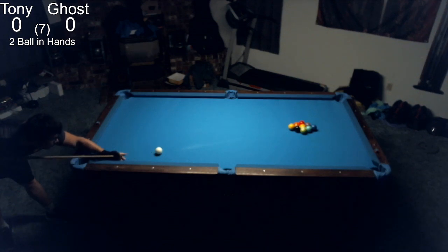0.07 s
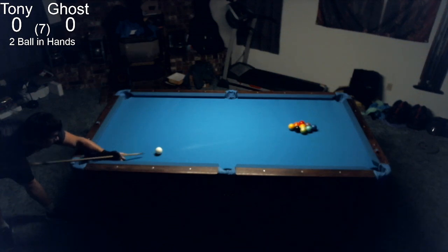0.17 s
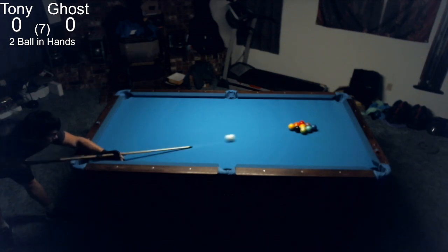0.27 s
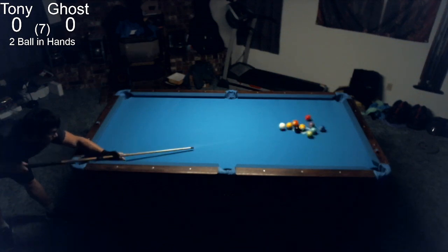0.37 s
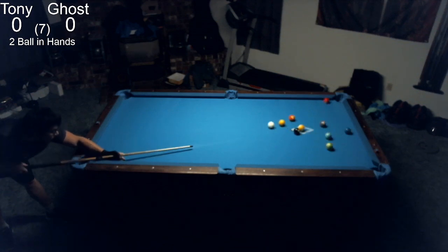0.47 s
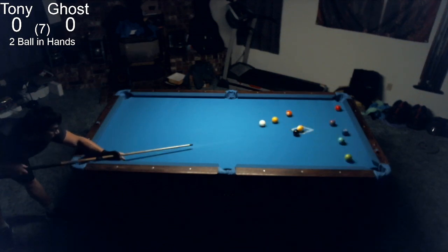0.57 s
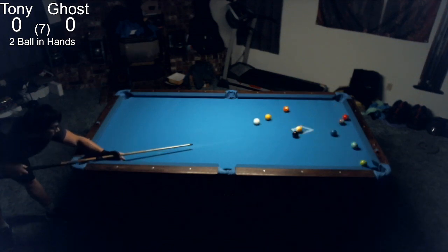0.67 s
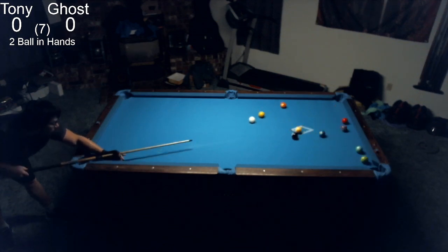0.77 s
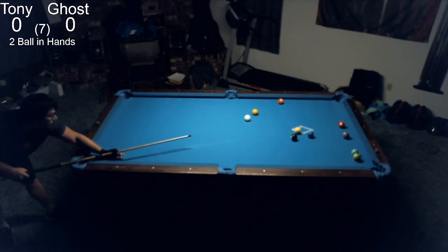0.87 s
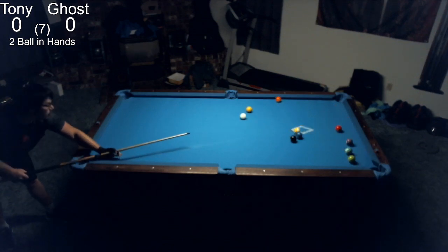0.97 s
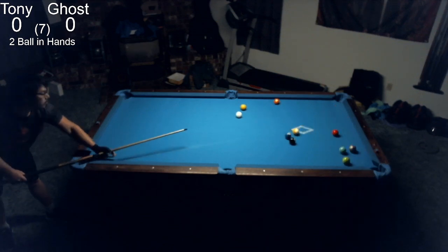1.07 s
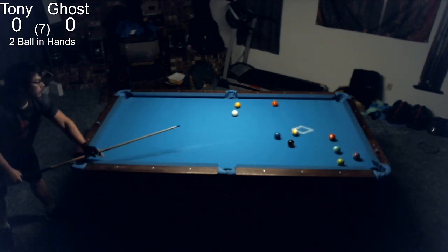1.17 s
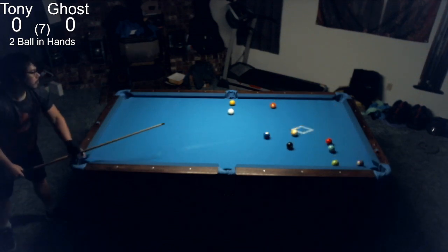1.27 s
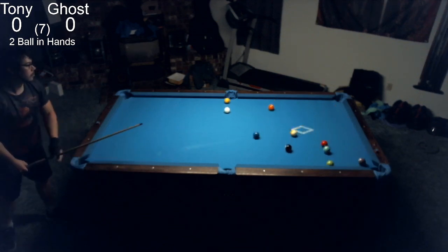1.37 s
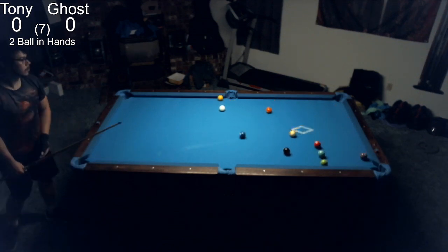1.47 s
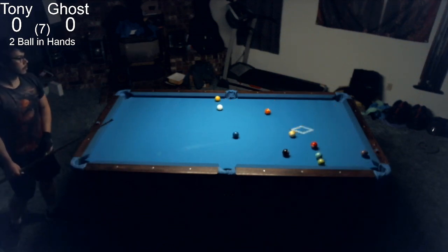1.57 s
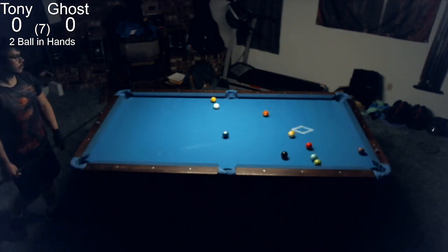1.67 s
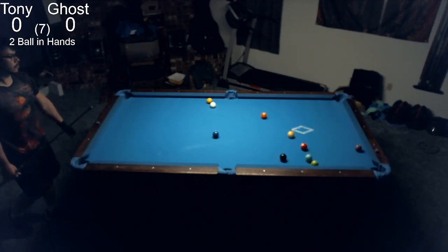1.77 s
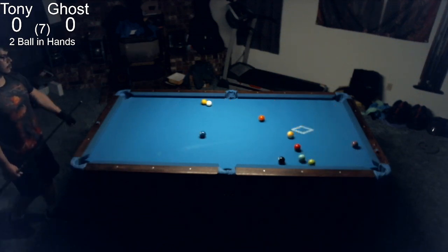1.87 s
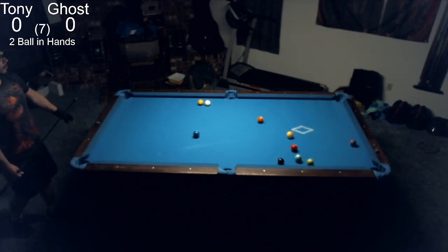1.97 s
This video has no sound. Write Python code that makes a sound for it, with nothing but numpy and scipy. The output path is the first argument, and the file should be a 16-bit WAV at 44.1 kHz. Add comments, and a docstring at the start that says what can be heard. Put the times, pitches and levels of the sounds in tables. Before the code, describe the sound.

A loud double crack of a pool break, cue strike then bursting rack, gives way to soft cushion thuds and scattered ball clicks that thin out. The microphone is high up in a quiet room with faint hum.

```python
"""A quiet carpeted room with a pool table: a nine-ball break, heard from near the ceiling.
The cue tip cracks and the shaft rings, the cue ball bursts the rack and overloads the input.
Balls rumble over the slate and thud into the cushions, and single balls click, loud at first and
softer later, each with its own echoes. A bed of mains hum and hiss lies under it all."""
import sys
import numpy as np
from scipy import signal
from scipy.fft import rfft, irfft
from scipy.io import wavfile

SR = 44100
rng = np.random.default_rng(int(sys.argv[2]) if len(sys.argv) > 2 else 0)


def wav_out(sig):
    """Save sig, one row per channel (or a flat mono array), as 16-bit PCM at SR to the path in sys.argv[1]."""
    wavfile.write(sys.argv[1], SR, np.round(np.clip(np.atleast_2d(sig).T, -1, 1) * 32767).astype(np.int16))


N = 88200

# The room's decay. Each row: frequency in Hz, time to fall 60 dB in seconds.
ROOM_DECAY = [(150, 0.37), (660, 0.43), (1740, 0.32), (4590, .3), (7000, 0.29)]
# Mains hum. Each row: frequency in Hz, rms level in dB.
HUM_PARTIALS = [(60, -69.5), (120, -92.5), (300, -91), (420, -94), (540, -93), (660, -92.5)]
# Tone of the hiss, the tip's crack and the rolling balls. Each row: frequency in Hz, relative level in dB.
HISS_TONE = [(50, -13.5), (130, -1.5), (200, -5), (320, -1.5), (600, -8), (1300, -9), (4600, -14),
             (7400, -21.5)]
TIP_TONE = [(150, -34.5), (250, -19), (450, -8.5), (1000, -7.5), (2100, -0.5), (3000, 1.5), (5000, 0),
            (6300, -9), (7500, -18.5)]
RUMBLE_TONE = [(60, -19.5), (110, -1), (200, 1), (350, 1.5), (700, -6), (1200, -28.5)]
# The shaft's ring. Each row: frequency in Hz, relative level in dB, time to fall 60 dB in seconds.
SHAFT_MODES = [(500, -17, .03), (1110, -10.5, .06), (1697, -3, 0.21), (2850, -4, 0.11), (2912.5, 2, 0.23),
               (3197, -8.5, 0.021), (3890, -5.5, 0.05), (4557, -2, 0.041), (4497, 0, .13),
               (4630, -10.5, .09), (5475, -3.5, .1), (5500, -4.5, 0.16), (5579, -11.5, 0.13)]
# Ball into cushion. Each row: start in seconds, level in dB, pitch in Hz.
CUSHION_HITS = [(0.295, -38, 478), (.40, -42, 212.6), (0.471, -29.5, 454), (.505, -33, 677),
                (0.534, -51.5, 121), (0.566, -44.5, 238), (.595, -58, 211), (.635, -63, 297),
                (.694, -59, 204), (0.791, -68, 161.3)]
# The rumble's fader. Each row: time in seconds, level in dB.
RUMBLE_FADER = [(.36, -116), (.40, -65), (.47, -51), (.58, -57), (.66, -75.5), (.76, -66), (.9, -97)]
# A click's low end; small spheres give little bass. Each row: frequency in Hz, relative level in dB.
CLICK_BASS = [(100, -57.5), (350, -42.5), (650, -24.5), (1000, -9), (1700, -3), (2300, 1.5)]
# A click's top end. Each row: frequency as a multiple of the treble edge, relative level in dB.
CLICK_TREBLE = [(.55, 4), (.72, -5.5), (.8, -10.5), (.88, -20.5), (.98, -34.5), (1.14, -30), (1.4, -40.5),
                (1.8, -63.5)]
# Ball on ball. Each row: start in seconds, level in dB, treble edge in Hz, reverb send in dB.
BALL_HITS = [(0.443, -30, 4970, 6.5), (0.7, -57.5, 4560, 16), (0.7156, -16, 5030, -8),
             (0.8981, -30.5, 4140, -6), (1.04, -46, 3750, -7), (1.355, -32.5, 4360, -3),
             (1.6581, -46, 4100, 3), (1.9061, -43, 3510, -6.5)]
# Echoes of the cue, the rack's run and its scatter. Each row: delay in milliseconds, gain in dB.
CUE_ECHOES = [(1.2, 6), (3, -3.5), (6, 7), (7.5, -0.5), (9, 0.5), (18, -5.5)]
RUN_ECHOES = [(4.1, 4.5), (7.5, -13), (25.5, -16)]
SCATTER_ECHOES = [(11, -1.5), (17, -1.5), (21, 0.5), (24, 7), (28, 5.5), (32, 6.5), (38, -7.5), (49, -3.5)]
# One echo list per ball hit, set by its spot on the table. Each row: delay in milliseconds, gain in dB.
BALL_ECHOES = [
    [(2, -2), (4, -3), (11, -4)],
    [(2, 0), (4, 0), (11, -2)],
    [(2, -2), (2.6, -4), (3.1, -2), (4.2, -5), (5.6, -10), (8.5, -10), (9.8, -9), (12.6, -10), (14.1, -9)],
    [(2, 1), (4.1, -5), (10, 0), (11.2, 0), (13.6, -1), (14.7, 0), (15.6, -2), (16.3, -4), (17.9, -4)],
    [(2.9, 1), (4.2, -6), (12.1, -3), (18, -5), (19.2, -4)],
    [(2, -2), (4, 0), (10.2, -5), (11.5, -1), (12.9, -2), (14, -3), (15.4, -2), (17.8, -6), (20.1, 0)],
    [(1.9, 2), (4, 4), (7.6, -4), (12.1, 2), (14.7, 1), (16.7, 1), (19.3, 0), (20.1, 4)],
    [(2, -8), (3.2, -1), (5.5, -7), (9, -9), (27, -2)],
]


def amp(db):
    """Decibels to gain."""
    return 10 ** (np.asarray(db) / 20)


def curve_at(points, hz):
    """Reads a curve along a log frequency axis."""
    freqs, values = np.transpose(points)
    return np.interp(np.log(hz + 1), np.log(freqs + 1), values)


def add(mix, start_s, sound):
    """Lays a sound into the mix."""
    part = mix[round(start_s * SR):][:len(sound)]
    part += sound[:len(part)]


def noise(length, tone):
    """Noise coloured by a tone curve, rms 1."""
    gain = amp(curve_at(tone, np.fft.rfftfreq(length, 1 / SR)))
    coloured = irfft(rfft(rng.standard_normal(length)) * gain, length)
    return coloured / np.sqrt(np.mean(coloured ** 2))


def low_cut(sound, hz, damping):
    """Second-order high-pass."""
    w = 2 * np.pi * hz
    return signal.lfilter(*signal.bilinear([1, 0, 0], [1, 2 * damping * w, w ** 2], SR), sound)


def in_room(sound, send_db, echoes=(), build_s=.024):
    """Direct sound, single echoes, and a tail of sparse reflections that builds and dies band by band."""
    taps = np.zeros(30000)
    slots = np.arange(100, 29900, 12)
    taps[slots + rng.integers(0, 12, len(slots))] = rng.choice([-1., 1.], len(slots))
    hz, t, bands = signal.stft(taps, SR, nperseg=256)
    decay = amp(-60 * t / curve_at(ROOM_DECAY, hz)[:, None])
    tail = signal.istft(bands * decay, SR, nperseg=256)[1][:len(taps)]
    tail *= np.clip(np.arange(len(tail)) / SR / build_s, 0, 1)
    response = amp(send_db + 9.5) * tail / np.linalg.norm(tail)
    response[0] = 1
    for ms, db in echoes:
        response[round(ms * SR / 1000)] += amp(db)
    return signal.fftconvolve(sound, response)


def hum_and_hiss():
    """The bed: mains hum with a few overtones over faint hiss."""
    t = np.arange(N) / SR
    hum = sum(np.sqrt(2) * amp(db) * np.sin(2 * np.pi * (hz * t + rng.random()))
              for hz, db in HUM_PARTIALS)
    return hum + amp(-80) * noise(N, HISS_TONE)


def cue_strike(crack_t60_s=.02, low_cut_hz=320):
    """The hard tip cracks and the shaft rings in its modes, too thin to give any bass."""
    t = np.arange(12000) / SR
    ring = sum(amp(db - 60 * t / t60) * np.sin(2 * np.pi * hz * t) for hz, db, t60 in SHAFT_MODES)
    crack = noise(len(t), TIP_TONE) * amp(-18 - 60 * t / crack_t60_s)
    strike = in_room(crack + amp(-32.5) * ring, send_db=-3, echoes=CUE_ECHOES)
    strike = low_cut(strike, low_cut_hz, damping=.7)
    return low_cut(strike, low_cut_hz, damping=.39)


def cushion_thud(db, hz, decay_cycles=.9):
    """Rubber and rail give a short, low swing."""
    cycles = np.arange(2500) / SR * hz
    envelope = cycles * np.exp(1 - cycles / decay_cycles)
    return in_room(amp(db) * envelope * np.sin(2 * np.pi * cycles), send_db=-15)


def slate_rumble():
    """Low noise while the balls run fast over the slate."""
    level_db = np.interp(np.arange(N) / SR, *np.transpose(RUMBLE_FADER))
    return amp(level_db) * noise(N, RUMBLE_TONE)


def ball_click(edge_hz):
    """Two balls meet in one pulse, peak 1. A harder hit is briefer, so its treble edge lies higher."""
    hz = abs(np.fft.fftfreq(1024, 1 / SR))
    tone_db = curve_at(CLICK_BASS, hz) + np.interp(hz / edge_hz, *np.transpose(CLICK_TREBLE))
    spectrum = np.exp(np.conj(signal.hilbert(np.log(amp(tone_db)))))  # minimum phase: a crisp attack
    pulse = -np.fft.ifft(spectrum).real[:400]
    return pulse / abs(pulse).max()


def rack_burst(step_ms=.33, slowing=.025, fade_db=-12.5, scatter_ms=7):
    """The blow runs from ball to ball, slowing and fading; scattered contacts follow as the rack parts."""
    run, scatter = np.zeros(900), np.zeros(900)
    run_click = ball_click(edge_hz=5405)
    scatter_click = ball_click(5190) + amp(-11.5) * ball_click(7190)  # a sharper tick rides on top
    for k, (jitter, accent_db, when, polarity) in enumerate(rng.standard_normal((8, 4))):
        start_ms = max(k + .05 * jitter, 0) * step_ms * (1 + slowing * k)
        level_db = 3 + fade_db * (k / 7) ** 2 + accent_db
        add(run, start_ms / 1000, amp(level_db) * run_click)
        add(scatter, scatter_ms * (when % 1) / 1000, amp(-17.5) * np.sign(polarity) * scatter_click)
    smack = in_room(run, send_db=-26.5, echoes=RUN_ECHOES)
    splash = in_room(scatter, send_db=4.5, echoes=SCATTER_ECHOES)
    return smack + splash


def scene():
    """The whole break over the bed, in mono."""
    mix = slate_rumble()
    add(mix, .21246, cue_strike())
    add(mix, .3669, rack_burst())
    for (start_s, db, edge_hz, send_db), echoes in zip(BALL_HITS, BALL_ECHOES):
        add(mix, start_s, in_room(amp(db) * ball_click(edge_hz), send_db, echoes))
    for start_s, db, hz in CUSHION_HITS:
        add(mix, start_s, cushion_thud(db, hz))
    return (mix + hum_and_hiss())[None]


def record(dry):
    """The input overloads on the break; the top rolls off, then stops at a steep band limit."""
    ceiling, roll_off_hz, band_limit_hz = .77, 6900, 7320
    saturated = dry / (1 + abs(dry / ceiling) ** 6) ** (1 / 6)
    crunch = low_cut(saturated - dry, hz=200, damping=.7)  # the overload leaves no low thump
    dulled = signal.sosfilt(signal.butter(4, roll_off_hz, fs=SR, output="sos"), dry + crunch)
    band_limit = signal.firwin(201, band_limit_hz, window=("kaiser", 10), fs=SR)
    return signal.oaconvolve(dulled, band_limit[None], "same")


dry = scene()
out = record(dry)
wav_out(out)
```